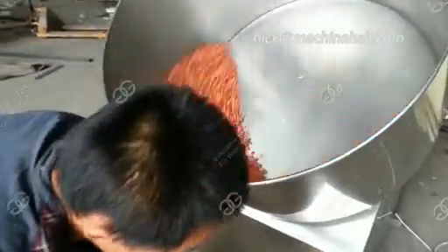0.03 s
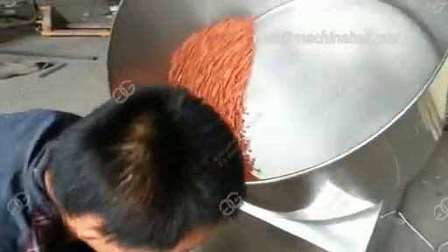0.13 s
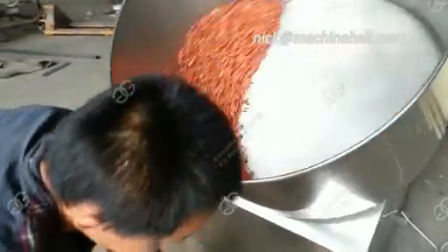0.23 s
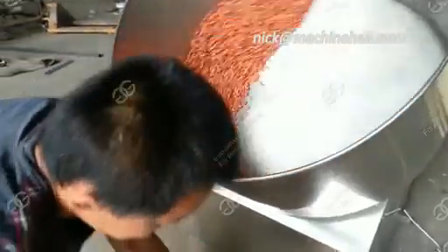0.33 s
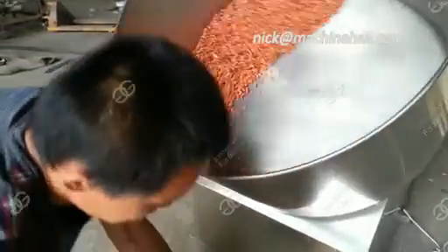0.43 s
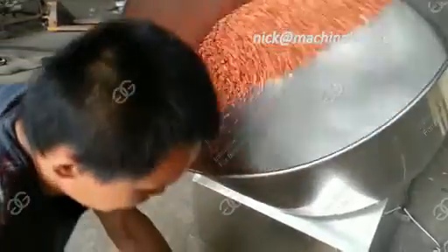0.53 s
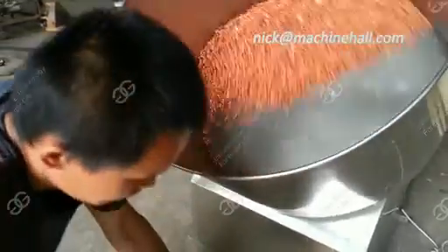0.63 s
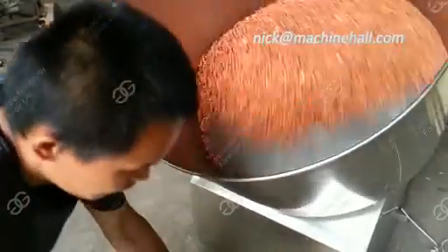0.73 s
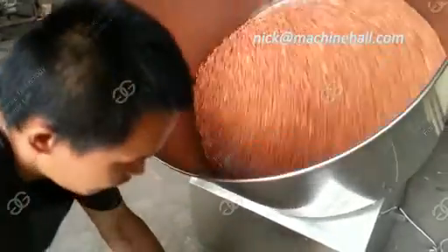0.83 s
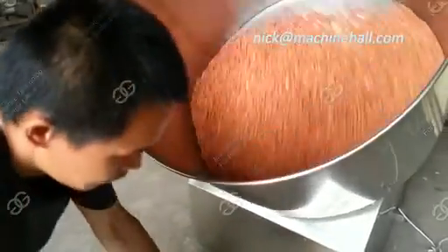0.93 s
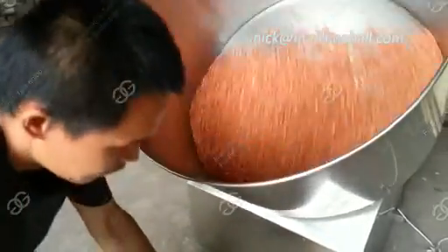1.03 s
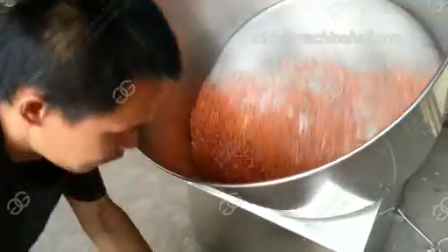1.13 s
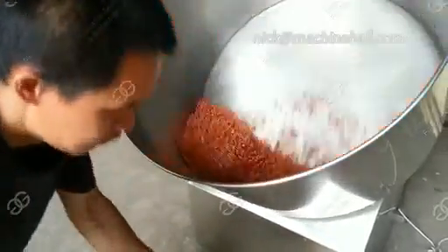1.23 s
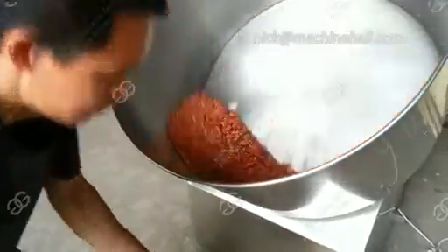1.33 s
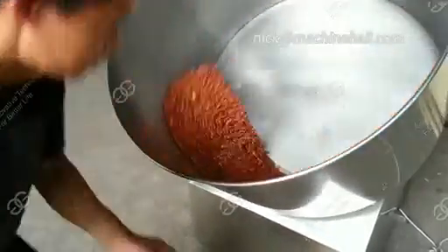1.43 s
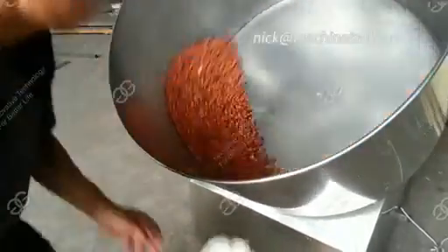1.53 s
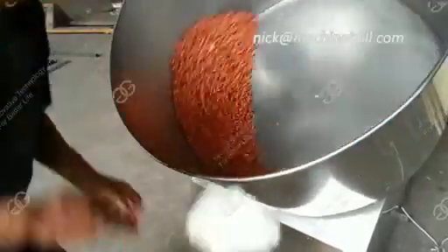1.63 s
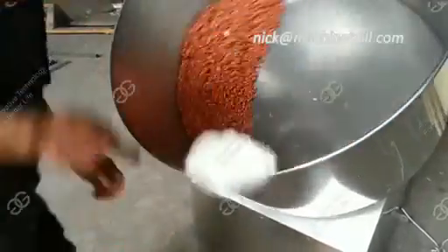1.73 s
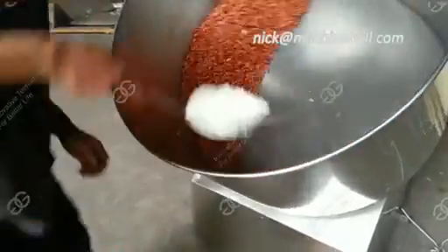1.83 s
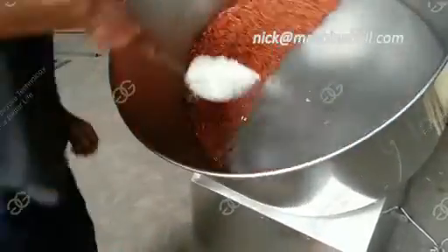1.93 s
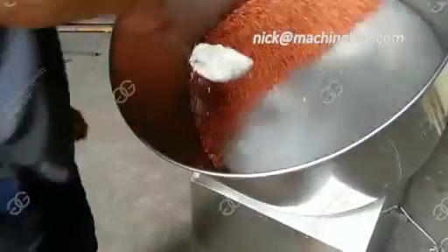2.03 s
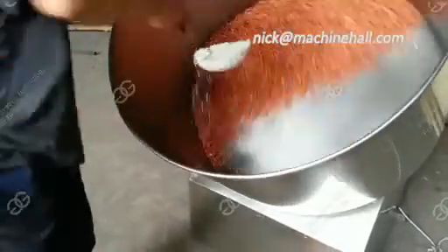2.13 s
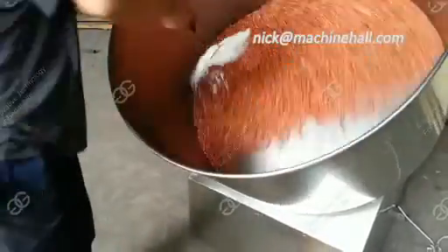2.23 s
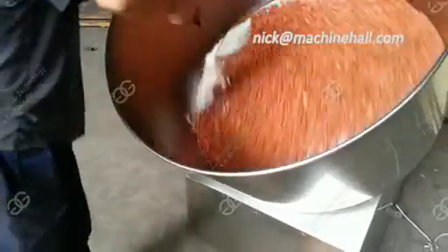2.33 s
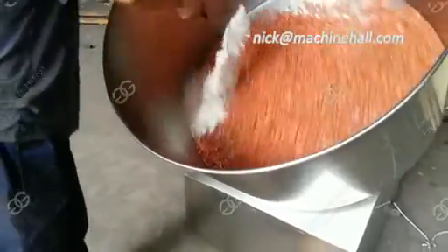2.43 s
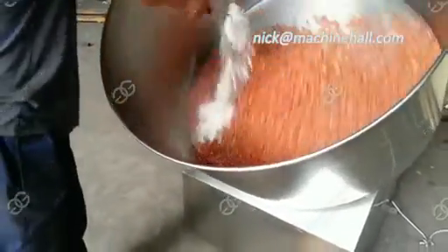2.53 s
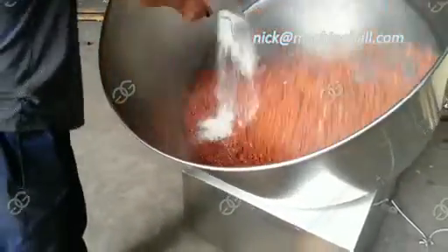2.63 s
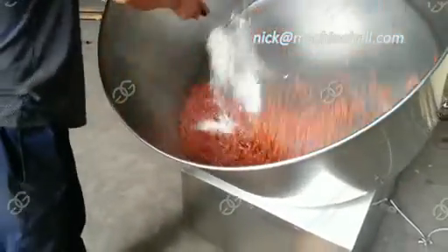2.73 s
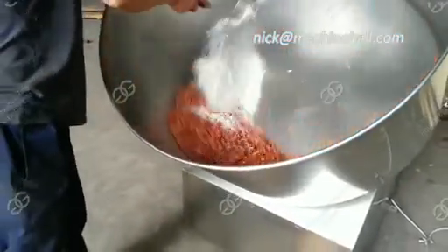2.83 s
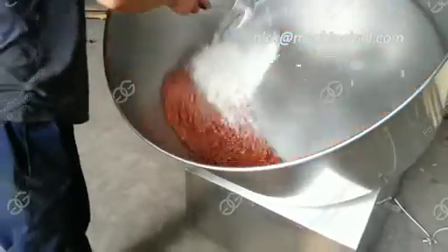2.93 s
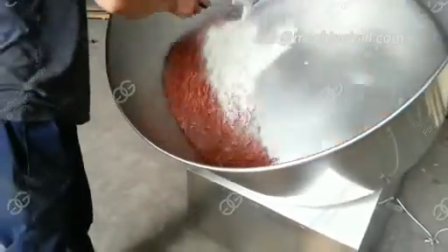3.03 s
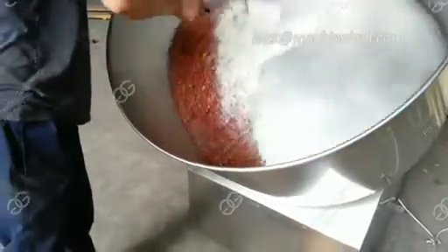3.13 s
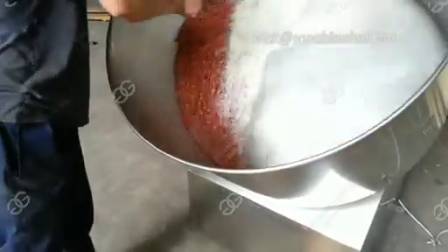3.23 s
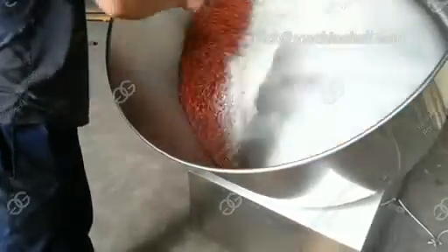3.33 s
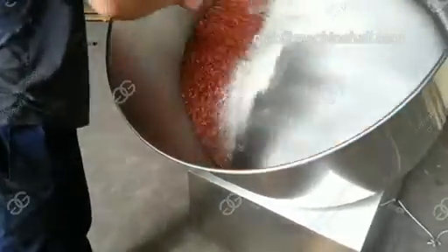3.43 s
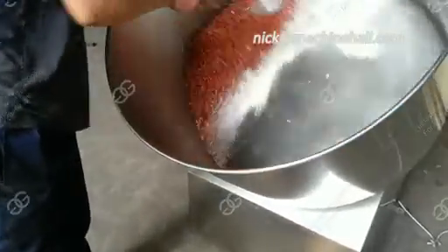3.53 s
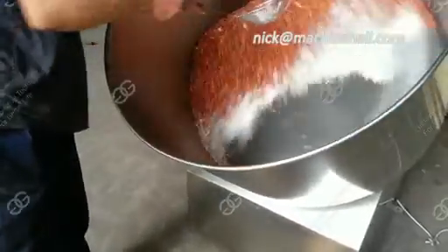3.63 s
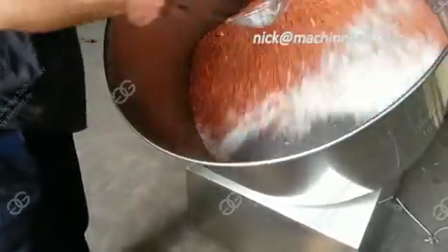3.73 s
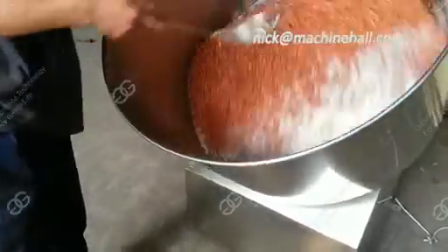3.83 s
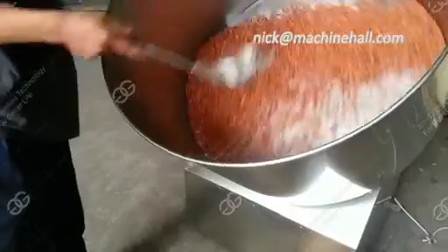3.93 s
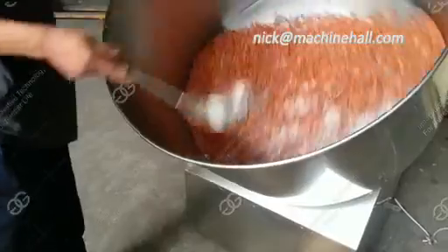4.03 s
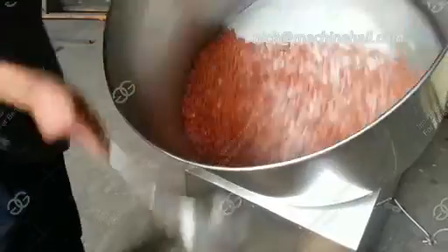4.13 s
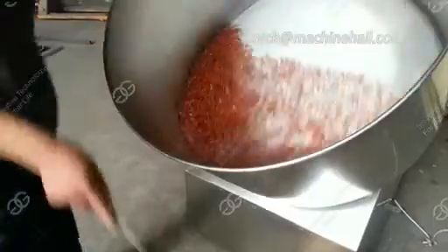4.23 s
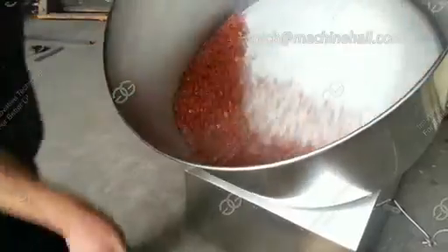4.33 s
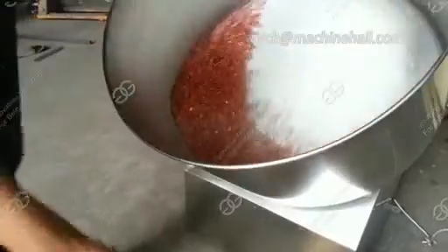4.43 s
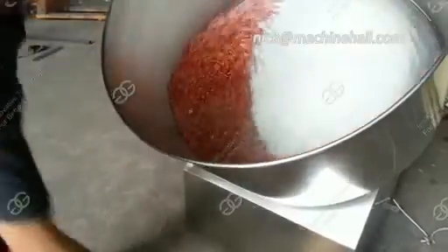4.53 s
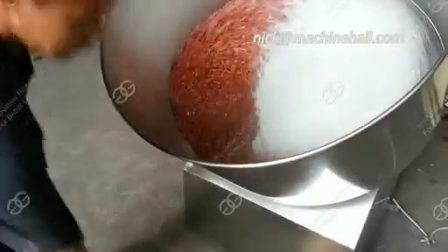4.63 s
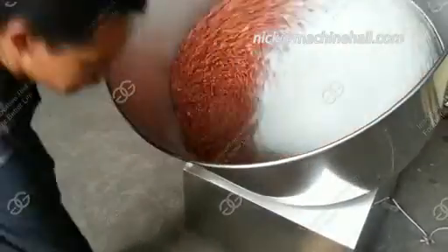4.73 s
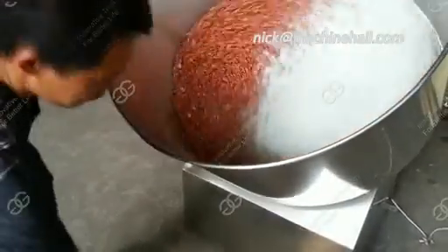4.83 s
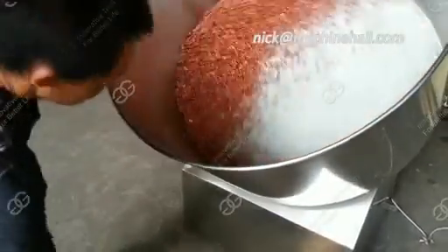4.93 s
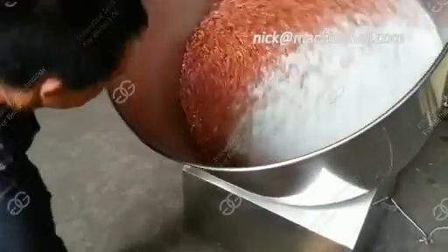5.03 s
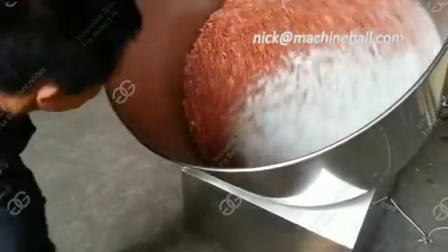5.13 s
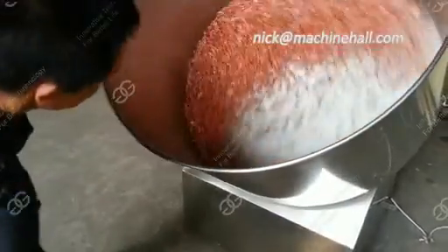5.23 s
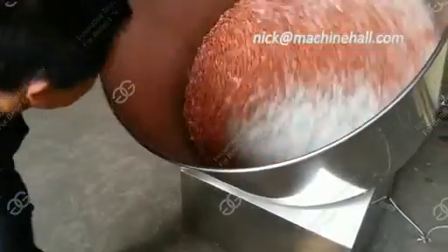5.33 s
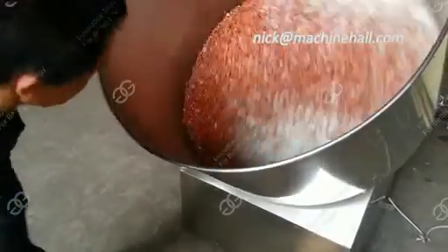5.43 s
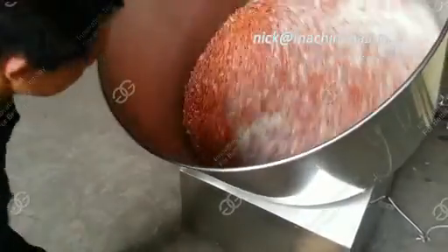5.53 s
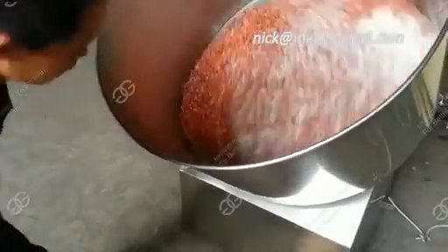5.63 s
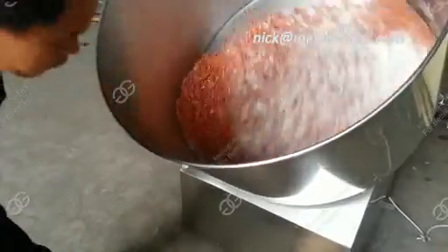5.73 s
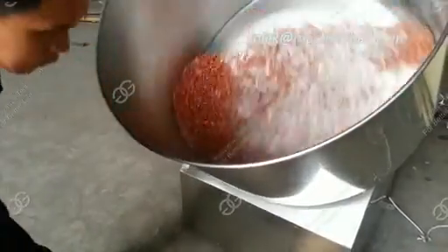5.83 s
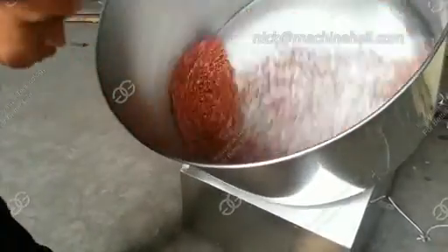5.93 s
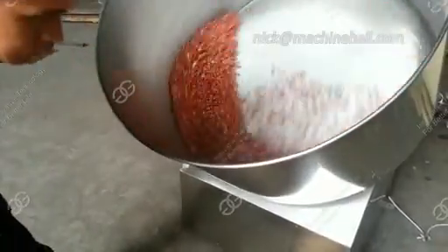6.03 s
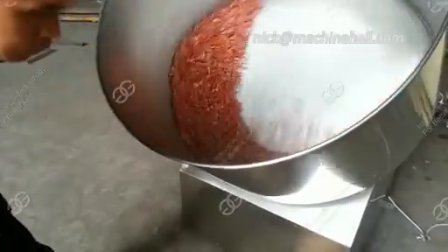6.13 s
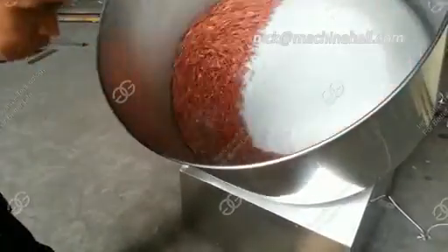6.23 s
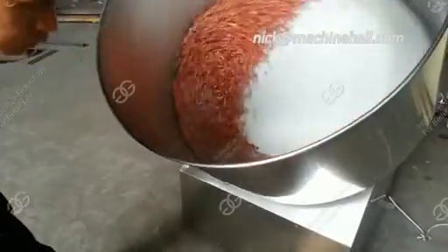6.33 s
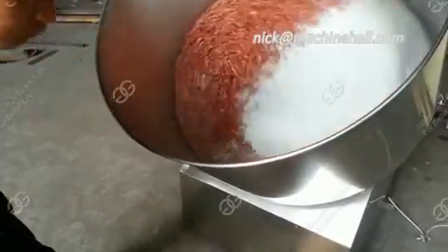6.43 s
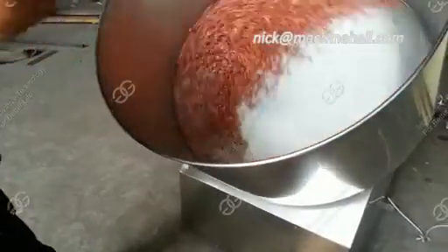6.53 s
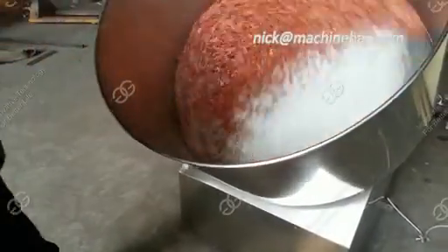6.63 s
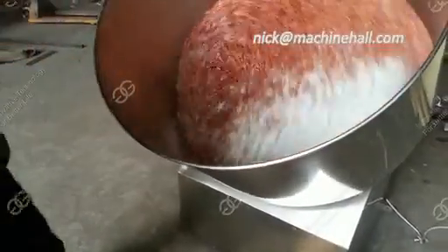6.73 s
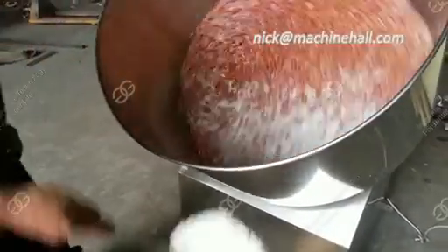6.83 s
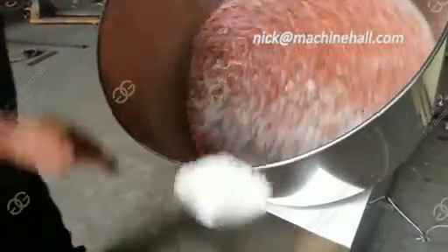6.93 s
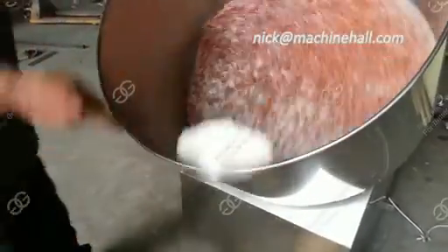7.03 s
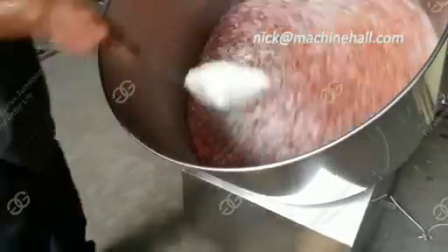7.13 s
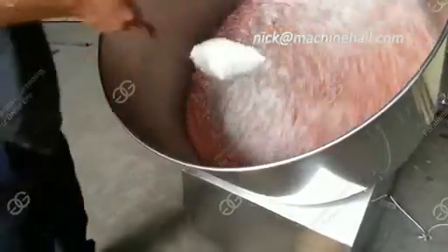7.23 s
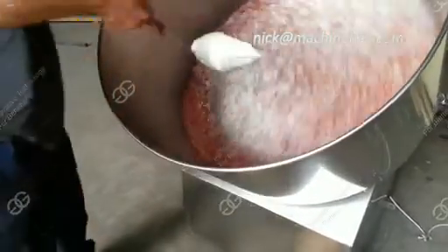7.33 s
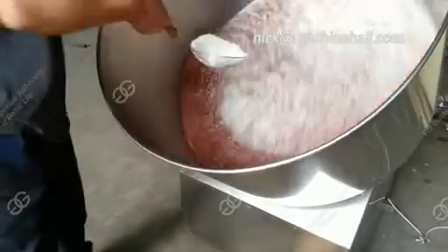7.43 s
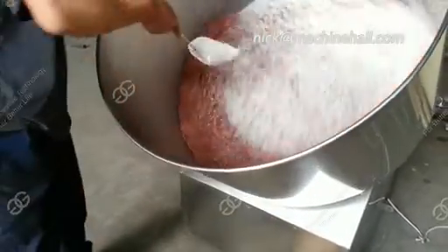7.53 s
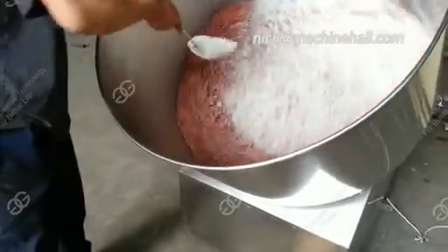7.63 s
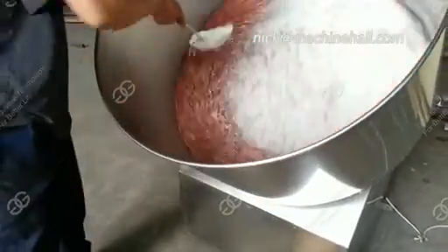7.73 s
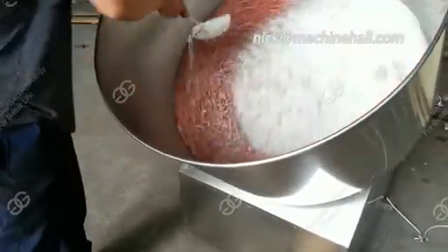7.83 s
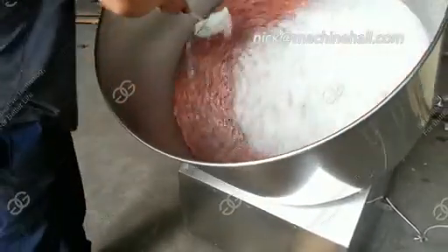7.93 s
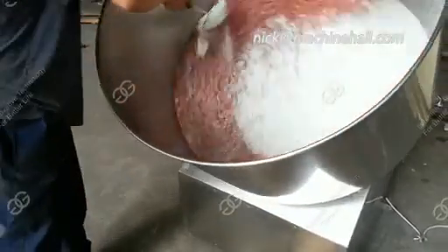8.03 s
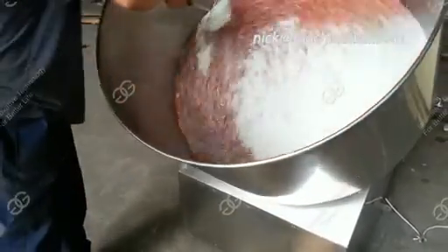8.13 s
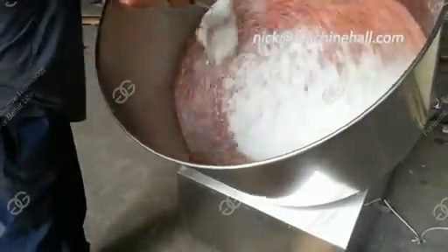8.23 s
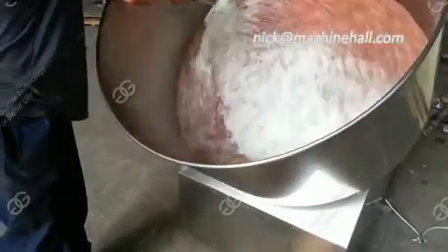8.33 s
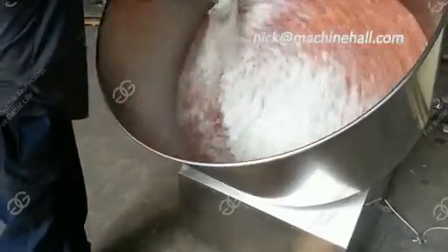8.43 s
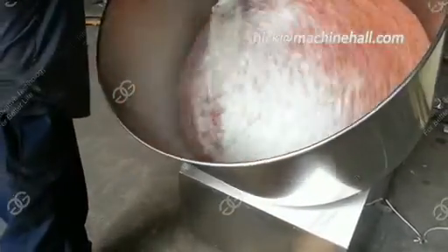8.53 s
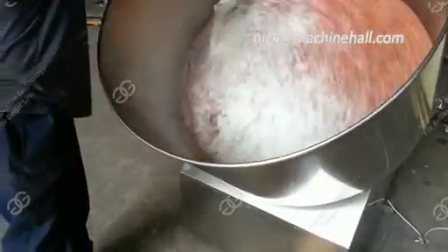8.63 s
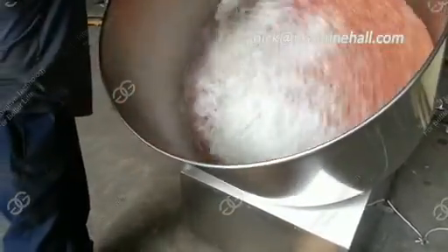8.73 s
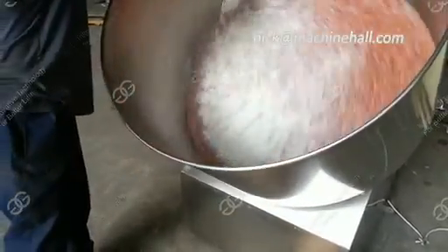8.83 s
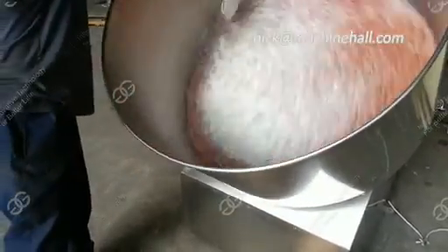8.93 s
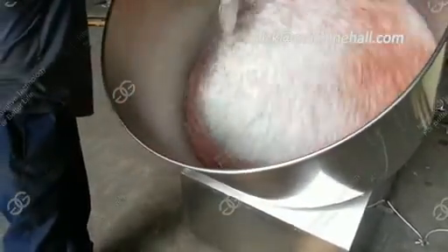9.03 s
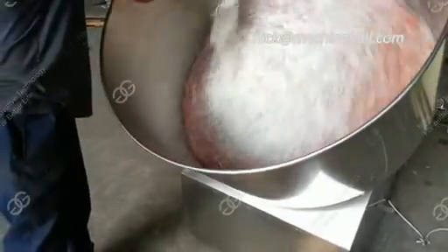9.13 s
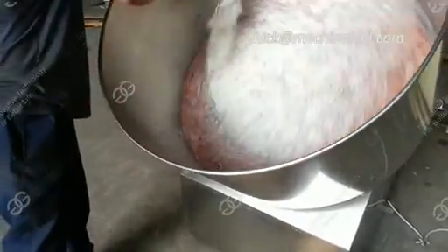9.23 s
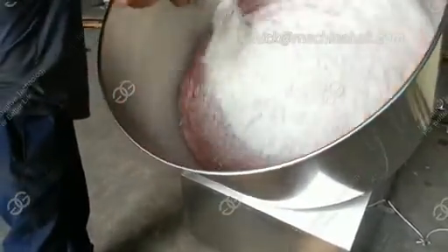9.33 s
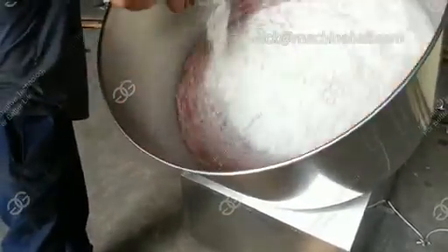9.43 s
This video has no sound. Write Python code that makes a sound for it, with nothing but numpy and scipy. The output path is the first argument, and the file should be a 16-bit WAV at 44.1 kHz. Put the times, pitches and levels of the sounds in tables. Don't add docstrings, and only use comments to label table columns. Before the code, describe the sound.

Close to a tilted, turning steel pan, thousands of small nuts roll with a dense, grainy rush. Roughly every one and a half seconds the heap breaks and slides in a louder, sizzling surge, the steel ringing along. Motor and gears rumble low in the factory hall behind. The phone's left side is bright and crackles with overload in the big slides; the right is duller and quieter, and the lows sink during surges.

```python
import sys
import numpy as np
from scipy import signal
from scipy.fft import rfft, irfft, next_fast_len
from scipy.io import wavfile
from scipy.ndimage import uniform_filter1d

SR = 44100
rng = np.random.default_rng(int(sys.argv[2]) if len(sys.argv) > 2 else 0)


def ratio_of_db(decibels):
    return 10 ** (np.asarray(decibels, float) / 20)


def log_audio(samples):
    frames = np.atleast_2d(samples).T
    limited = np.clip(frames, -1, 1)
    pcm = np.round(limited * 32767).astype(np.int16)
    wavfile.write(sys.argv[1], SR, pcm)


N = 418950

# start_s, level_db, heap_weight_db on the steel
HEAP_ROLL = [(0, -35, -1), (.22, -37, -3), (.6, -32, 0.5), (1.1, -29, 0.5), (1.5, -31.5, -1.5),
             (1.7, -34, -0.5), (2.6, -30, 0.5), (3.2, -34, -1), (3.72, -33, 1), (4.2, -31, 2),
             (4.72, -33.5, -1.5), (5.6, -29.5, 3.5), (5.97, -32.5, -0.5), (6.55, -33.5, -0.5),
             (7.3, -30, 3), (7.93, -34, 1.5), (8.8, -31, 3), (9.5, -33.5, 1.5)]


def nuts():
    hits = knocks(size_db=2.0, clump_db=0.85)
    roll_db, weight_db = in_time(HEAP_ROLL)
    slide_db, slide_sizzle_db, slide_ring_db = slides()
    swell_db = mouth_swells()

    slide_ring_db = 10 * np.log10(lagged(ratio_of_db(slide_ring_db) ** 2, lag_s=0.021) + 1e-12)
    rush_db = summed(roll_db, slide_db)
    sizzle_db = summed(roll_db - 1.0, slide_sizzle_db)
    upper_rush_db = rush_db - 3 + 0.4 * (sizzle_db - rush_db)

    roll_ring_db, swell_ring_db = roll_db - 0.5, swell_db - 5
    high_ring_db = summed(roll_ring_db + 0.3 * weight_db, slide_ring_db, swell_ring_db) - 2.5
    low_ring_db = summed(roll_ring_db, slide_ring_db - 2.0, swell_ring_db) - 3.0 + 0.36 * weight_db

    late_rush_db = lagged(rush_db - rush_db.mean(), lag_s=0.2)
    body_db = -33 + weight_db + 0.25 * late_rush_db + 0.83 * ducking()

    levels_db = [rush_db - 2.5, upper_rush_db, sizzle_db, high_ring_db, low_ring_db, body_db]
    heap = sum(ratio_of_db(db) * rms_one(layer) for db, layer in zip(levels_db, pan_layers(hits)))
    bowl_db = summed(roll_db - 6, slide_ring_db - 3.5, swell_db - 2.5)
    return heap + ratio_of_db(bowl_db) * bowl_ring(hits)


def knocks(size_db, clump_db):
    knocks_per_s = 12000
    born = rng.random((2, 2, N)) < knocks_per_s / SR
    sizes = ratio_of_db(size_db * np.minimum(rng.exponential(1, (2, 2, N)), 4))
    sizes = sizes * rng.standard_normal((2, 2, N))
    return born * sizes * ratio_of_db(clump_db * drift(24.2)) + 1e-18


# pitch_hz, level_db per Hz
KNOCK_COLOUR = [(240, -38), (400, 2.5), (602, 0), (866, -4), (1060, 3), (1320, 0), (1610, 3), (2340, -5.5),
                (4070, -2.5), (5240, -10.5), (5600, -7), (7280, -50), (12300, -120)]
# low_hz, high_hz, band_count
PAN_LAYERS = [(1800, 2455, 2), (2455, 3350, 2), (3250, 5900, 3), (1350, 1900, 2), (960, 1350, 2),
              (450, 1020, 3)]
# pitch_hz, width_hz, level_db against the knock noise around them
PAN_MODES = [(585, 52, -14), (610.3, 44, -4), (800, 60, -8), (917, 22, -10), (1036.4, 23, -9),
             (1096, 74, -14.5), (1240, 150, -4.5), (1383, 23, -11.5), (1455, 62, -4), (1755, 86, -8.5),
             (1923, 160, -10.5), (2082, 31, -11), (2188, 320, -4.5), (2612, 55, -13), (3060, 82, -29),
             (3400, 140, -17.5), (3916, 110, -10.5), (4163, 71, -10.5)]


def pan_layers(hits):
    layers = [bands(hits, KNOCK_COLOUR, low, high, 0.69, count) for low, high, count in PAN_LAYERS]
    for k, (hz, width, level_db) in enumerate(PAN_MODES):
        home = [low < hz <= high for low, high, count in PAN_LAYERS].index(True)
        mode = spread(resonance(hits[k % 2], hz, width), hz)
        wander_db = 1.5 * drift(5.4)
        layers[home] = layers[home] + ratio_of_db(level_db + wander_db) * mode
    return layers


# pitch_hz, width_hz, level_db
BOWL_MODES = [(1553, 13, 1.5), (1614, 29, -7.4), (1642, 44, 3.5)]


def bowl_ring(hits):
    ring = 0
    for hz, width, level_db in BOWL_MODES:
        ring = ring + ratio_of_db(level_db) * spread(resonance(hits[0], hz, width), hz)
    return rms_one(ring)


# sizzle_db, ring_db
HEAP_SLIDES = [(0.493, 0.18, -34.5, 3, -10.5), (.69, 0.28, -25, -0.5, -5), (1.913, 0.076, -27, -3.5, -1),
               (2.047, 0.091, -28.5, -15, -3.5), (2.182, 0.23, -27.5, 5, -5.5),
               (2.31, 0.13, -28.5, -2, -1.5), (2.748, 0.23, -32.5, -3, -0.5), (3.308, 0.18, -37, 1, 2.5),
               (3.784, .22, -24.5, -1, -2.5), (4.327, 0.042, -31.5, -5, 5), (4.783, .04, -32.5, 1, 1),
               (4.846, 0.041, -30, 0, -1.5), (4.976, 0.034, -25.5, -3, -4.5),
               (5.097, 0.29, -23.5, -1.5, -5.5), (5.977, .13, -35, -1, 6.5), (6.154, 0.14, -37, 2.5, 5.5),
               (6.604, 0.38, -22, -6.5, -2.5), (6.891, 0.08, -24.5, -5.5, -6), (7.051, 0.2, -32.5, -3, 1),
               (8.034, 0.11, -36, 0, 5.5), (8.26, 0.16, -27, -1, 1.5), (8.383, 0.18, -24, -6.5, 0)]
# start_s, rush_db, sizzle_db against the rush
SMALL_SLIPS = [
    (.285, -37, 3),
    (1.31, -31, -1.5),
    (7.955, -29.5, -2.5),
    (8.945, -29, -9),
    (9.13, -36.5, -12),
    (9.295, -38, -3),
    (4.425, -33.5, 3),
]


def slides():
    attack_s, arch_db, release_db_per_s = 0.014, 1.5, 79.5
    slip_s, slip_ring_db = 0.015, 1
    slips = [(at, slip_s, db, sizzle_db, slip_ring_db) for at, db, sizzle_db in SMALL_SLIPS]
    s = np.arange(0, N, 64) / SR
    power = 1e-12
    for at, length, db, sizzle_db, ring_db in HEAP_SLIDES + slips:
        arch = arch_db * np.sin(np.pi * np.clip((s - at) / length, 0, 1))
        release = release_db_per_s * np.maximum(s - at - length, 0)
        level = np.clip((s - at) / attack_s, 0, 1) * ratio_of_db(db + arch - release)
        power = power + np.outer(ratio_of_db(np.array([0, sizzle_db, ring_db])), level) ** 2
    return [np.interp(np.arange(N) / SR, s, 10 * np.log10(p)) for p in power]


# centre_s, half_length_s, level_db
MOUTH_SWELLS = [(.03, 0.12, -37), (.32, .08, -42.5), (.93, 0.14, -28.5), (1.35, 0.34, -30.5),
                (1.97, 0.23, -36), (2.39, 0.22, -27.5), (2.84, 0.14, -27), (3.0, 0.069, -26),
                (3.52, 0.06, -36.5), (3.88, 0.18, -33.5), (4.33, 0.077, -24), (4.89, 0.045, -29),
                (5.23, 0.036, -25.5), (5.45, 0.14, -22.5), (5.75, 0.24, -28.5), (6.08, 0.068, -43.5),
                (6.76, 0.094, -22), (7.05, .04, -37.5), (7.16, 0.06, -28), (7.4, 0.11, -27),
                (7.52, 0.044, -24.5), (7.65, 0.12, -30.5), (8.08, 0.11, -30), (8.31, 0.072, -27.5),
                (8.5, 0.042, -34), (8.75, 0.52, -28.5), (9.19, 0.12, -29.5), (9.46, 0.3, -26.5)]


def mouth_swells():
    return swells(MOUTH_SWELLS)


# pitch_hz, level_db per Hz
HALL_COLOUR = [(15, -52), (25, -18.5), (81, -20), (144, -6.5), (177, 3), (211, -3.5), (240, -1),
               (321, -2.5), (520, -4), (680, -34), (1140, -120)]
# pitch_hz, width_hz, level_db against
HUMS_AND_RINGS = [(73.4, 11, -13), (95.5, 10, -10), (118, 4.8, -13.5), (184.3, 10, -10), (348, 7.2, -17.5),
                  (377.5, 6, -12)]
# centre_s, level_db
GEAR_LOADING = [(0.101, -37.5), (1.202, -41.5), (1.851, -34.5), (2.6, -38.5), (3.3, -41.5), (4.301, -35),
                (4.85, -37), (5.58, -38.5), (6.1, -36), (7.2, -59), (7.6, -57), (8.628, -47), (9.12, -44),
                (9.5, -54.5)]


def hall():
    white = rng.standard_normal((2, 2, N))
    rumble = bands(white, HALL_COLOUR, 26.2, 449, 1.7, count=9)
    for k, (hz, width, level_db) in enumerate(HUMS_AND_RINGS):
        hum = spread(resonance(white[k % 2], hz, width), hz)
        rumble = rumble + ratio_of_db(level_db + 0.74 * drift(0.35)) * hum

    gear_hz, gear_width_hz, gear_swell_s, gear_idle_db = 243.8, 9, 0.27, -41.5
    gear = spread(resonance(white[0], gear_hz, gear_width_hz), gear_hz)
    gear_db = summed(gear_idle_db, swells([(at, gear_swell_s, db) for at, db in GEAR_LOADING]))
    duck_db = ducking()
    return ratio_of_db(-35.5 + duck_db) * rms_one(rumble) + ratio_of_db(gear_db - 3.0 + 0.5 * duck_db) * gear


def scene():
    return ratio_of_db(0.55) * nuts() + ratio_of_db(2.0) * hall()


def rms_one(x):
    return x / np.sqrt(np.mean(x ** 2) + 1e-20)


def in_time(rows):
    s, *columns = np.transpose(rows)
    return [np.interp(np.arange(N) / SR, s, c) for c in columns]


def at_hz(points, hz):
    table_hz, values = np.transpose(points)
    return np.interp(np.log(hz), np.log(table_hz), values)


def summed(*levels_db):
    return 10 * np.log10(sum(ratio_of_db(db) ** 2 for db in levels_db) + 1e-12)


def swells(rows):
    s = np.arange(N) / SR
    power = 1e-12
    for at, half, db in rows:
        bump = np.cos(np.pi / 2 * np.clip((s - at) / half, -1, 1))
        power = power + (ratio_of_db(db) * bump) ** 2
    return 10 * np.log10(power)


def lagged(x, lag_s):
    r = np.exp(-1 / (lag_s * SR))
    return signal.lfilter([1 - r], [1, -r], x)


def drift(rate):
    r = np.exp(-80 * np.pi * rate / SR)
    slow = signal.lfilter([1], [1, -2 * r, r * r], rng.standard_normal(N // 40 + 2002))[2000:]
    return np.interp(np.arange(N) / 40, np.arange(len(slow)), rms_one(slow))


def resonance(x, hz, width):
    r = np.exp(-np.pi * width / SR)
    pushes = x * rng.choice([-1, 1], N)
    poles = [1, -2 * r * np.cos(2 * np.pi * hz / SR), r * r]
    return rms_one(signal.lfilter([1, 0, -1], poles, pushes))


def bands(exciter, spectrum, low_hz, high_hz, patchy_db, count):
    out = 0
    edges = np.geomspace(low_hz, high_hz, count + 1)
    for k, (low, high) in enumerate(zip(edges, edges[1:])):
        band_pass = signal.butter(2, [low, high], "band", fs=SR, output="sos")
        pair = signal.sosfilt(band_pass, exciter[k % 2])
        hz = np.sqrt(low * high)
        out = out + ratio_of_db(at_hz(spectrum, hz) + patchy_db * drift(4.9)) * spread(pair, hz)
    return rms_one(out)


# pitch_hz, likeness (0 to 1)
PORT_LIKENESS = [(40, .7), (90, .93), (250, .9), (460, .68), (600, .86), (860, .5), (1300, .42),
                 (1700, .56), (2350, .12), (5000, .15)]


def spread(pair, hz):
    alike = np.clip(at_hz(PORT_LIKENESS, hz), 0, .99)
    middle = np.sqrt(1 + alike) * pair[0]
    side = np.sqrt(1 - alike) * pair[1] * [[1], [-1]]
    return (middle + side) / np.sqrt(2)


# deepest_s, sinking_s, depth_db
GAIN_DUCKS = [
    (.88, 0.19, -7.5),
    (2.361, 0.11, -9),
    (3.92, 0.11, -6.5),
    (5.37, 0.37, -4.5),
    (6.92, 0.1, -6.5),
    (8.451, 0.13, -3.5),
]


def ducking():
    recover_s = 0.086
    s = np.arange(N) / SR
    gain_db = 0
    for at, sink, depth_db in GAIN_DUCKS:
        gain_db = gain_db + np.interp(s, [at - sink, at, at + recover_s], [0, depth_db, 0])
    return gain_db


TOP_HZ = 5496
FRAME = 1024
# pitch_hz, left_over_right_db
PORT_SHADE = [(60, 1), (110, -0.5), (200, 2), (380, 4.5), (700, 7), (1290, 9.5), (2380, 19), (4400, 30),
              (8120, 22), (15000, 23)]
# pitch_hz, lead_radians
PORT_LEAD = [(40, .35), (180, .6), (380, .5), (500, .8), (1250, .8), (1400, 1.8), (1650, 2.1), (2300, .7),
             (3200, -1.0), (4500, -2.4)]


def ports(x):
    size = next_fast_len(N + 4096)
    hz = np.arange(size // 2 + 1) * SR / size + 1
    shade, lead = ratio_of_db(-at_hz(PORT_SHADE, hz)), at_hz(PORT_LEAD, hz)
    left = 2 / np.sqrt(1 + shade ** 2 + 2 * shade * at_hz(PORT_LIKENESS, hz) * np.cos(lead))
    right = left * shade * np.exp(-1j * lead)
    x = irfft(rfft(x, size) * [left, right], size)[:, :N]

    edge_band = signal.ellip(6, .5, 80, [TOP_HZ, TOP_HZ + 450], "band", fs=SR, output="sos")
    edge = signal.sosfilt(edge_band, x)
    let_through = 1.0 * (rng.random(N // FRAME + 1) < 0.2)
    let_through = uniform_filter1d(np.repeat(let_through, FRAME)[:N], size=512)
    steep_cut = signal.ellip(14, .5, 105, TOP_HZ, fs=SR, output="sos")
    return signal.sosfilt(steep_cut, x) + ratio_of_db(-19) * let_through * edge


# start_s, end_s, crackle_db
OVERLOAD_SPANS = [
    (.705, 0.734, 2.5),
    (0.81, 0.967, 2.5),
    (2.224, 2.493, 1),
    (2.787, 2.86, -1),
    (3.812, 4.06, 3.5),
    (4.985, 5.036, 0),
    (5.117, 5.457, 1.5),
    (6.626, 7.067, 1),
    (7.161, 7.215, -5),
    (8.317, 8.634, 2.5),
]
# start_s, peak_db
LONE_PEAKS = [(.7115, -28.5), (.787, -26.5), (1.112, -40), (1.124, -40), (1.174, -54), (1.3099, -39),
              (1.835, -32), (2.202, -28.5), (2.794, -34), (2.802, -32.5), (2.83, -33), (2.869, -34),
              (3.0056, -37), (4.349, -35), (4.358, -34.5), (4.3789, -37), (4.8798, -37), (4.944, -49.5),
              (4.991, -27), (5.013, -32.5), (5.107, -33.5), (5.557, -36), (6.323, -37), (7.091, -43),
              (7.1446, -36), (7.2025, -41.5), (7.217, -39), (7.2759, -37), (7.303, -45), (8.282, -26),
              (9.301, -49.5), (9.3945, -43)]
# pitch_hz, level_db per Hz
HISS_COLOUR = [(5500, -1.5), (8000, -11.5), (10500, -9), (12100, -6), (12500, -29.5), (13300, -50),
               (13550, -9.5), (15850, -18)]
HISS_EDGES_HZ = [5500, 6500, 8200, 10200, 12300, 13400, 15200, 15900]
HISS_DROP_SHARES = [.05, .05, .02, .02, .6, .02, .35]
# low_hz, high_hz
THIN_BANDS_HZ = [(10300, 12300), (13600, 15700)]


def crackle(cut_off):
    s = np.arange(N) / SR
    gate = 0
    for start, end, level_db in OVERLOAD_SPANS:
        gate = gate + ratio_of_db(level_db) * np.interp(s, [start - .01, start, end, end + 0.039], [0, 1, 1, 0])
    cut_off = cut_off * gate
    for at, peak_db in LONE_PEAKS:
        cut_off[round(at * SR)] += ratio_of_db(peak_db + 20.5)

    splinter_band = signal.ellip(6, .5, 70, [5500, 10500], "band", fs=SR, output="sos")
    ticks = signal.sosfilt(splinter_band, cut_off)
    thin = 0
    for band in THIN_BANDS_HZ:
        thin = thin + signal.sosfilt(signal.butter(4, band, "band", fs=SR, output="sos"), cut_off)

    window = np.hanning(1100)
    tick_power = signal.fftconvolve(ticks ** 2, window / window.sum(), "same")
    smeared = np.sqrt(np.abs(tick_power)) + ratio_of_db(-60.0) * gate

    hz = np.arange(N // 2 + 1) * SR / N + 1
    white = rfft(rng.standard_normal(N)) * ratio_of_db(at_hz(HISS_COLOUR, hz))
    hiss, frames = 0, N // FRAME + 1
    for low, high, drops in zip(HISS_EDGES_HZ, HISS_EDGES_HZ[1:], HISS_DROP_SHARES):
        ragged = ratio_of_db(-4.0 * rng.exponential(1, frames))
        present = rng.random(frames) > drops
        steps = np.repeat(ragged * present, FRAME)[:N]
        block = irfft(white * (hz > low) * (hz <= high), N)
        hiss = hiss + uniform_filter1d(steps, size=256) * block
    return ratio_of_db(-0.5) * ticks + ratio_of_db(-8.0) * thin + ratio_of_db(-6.0) * smeared * rms_one(hiss)


def overload(x):
    rounded = -.5 * np.maximum(x - .6, 0)
    cut_off = -.93 * np.minimum(x + 0.41, 0)
    dull = signal.ellip(8, .2, 45, TOP_HZ, fs=SR, output="sos")
    return x + signal.sosfiltfilt(dull, cut_off + rounded) + crackle(cut_off)


# deepest_s, fall_s, rise_s
LEFT_MUTES = [
    (5.291, 0.016, 0.024),
    (5.377, 0.019, 0.017),
    (7.02, 0.027, 0.014),
]


def left_mutes():
    gain = 1
    for at, fall, rise in LEFT_MUTES:
        gain = gain * np.interp(np.arange(N) / SR, [at - fall, at, at + rise], [1, .08, 1])
    return gain


def roll_off(x):
    return signal.sosfilt(signal.butter(12, 16210, fs=SR, output="sos"), x)


def record(dry):
    x = ports(dry)
    x[0] = overload(x[0])
    x = signal.sosfilt(signal.butter(1, 12, "high", fs=SR, output="sos"), x)
    x[0] *= left_mutes()
    s = np.arange(N) / SR
    fade_in = np.clip(s / 0.0033, 0, 1)
    fade_out = np.clip((N / SR - s) / 0.0053, .4, 1)
    mix = x * fade_in * fade_out
    return roll_off(mix)


dry = scene()
out = record(dry)
log_audio(out)
```